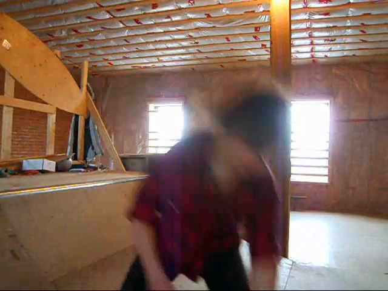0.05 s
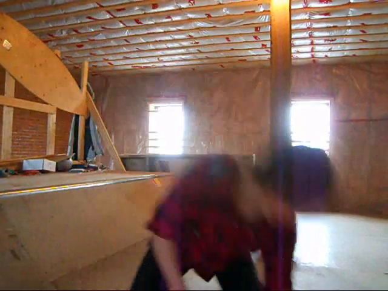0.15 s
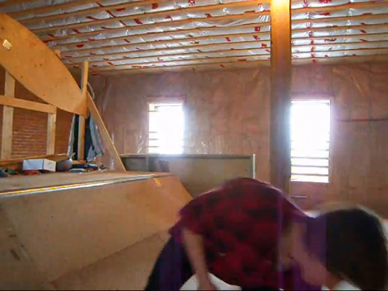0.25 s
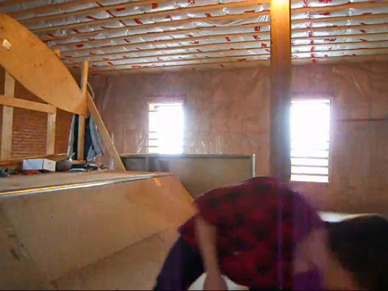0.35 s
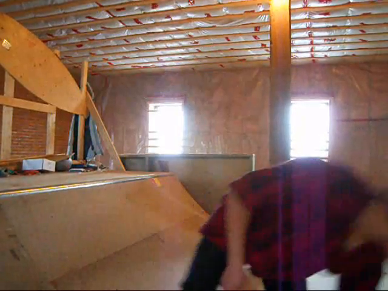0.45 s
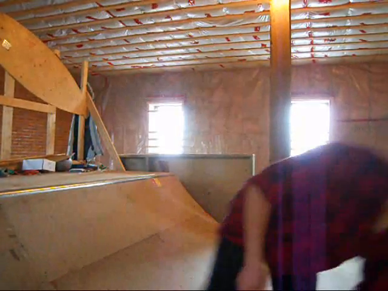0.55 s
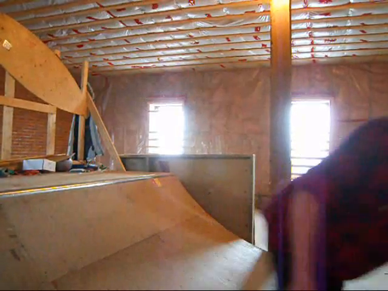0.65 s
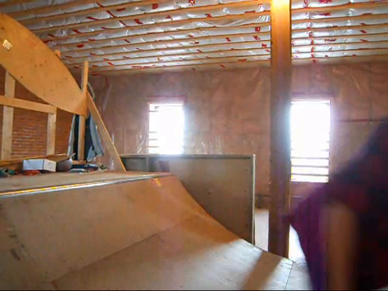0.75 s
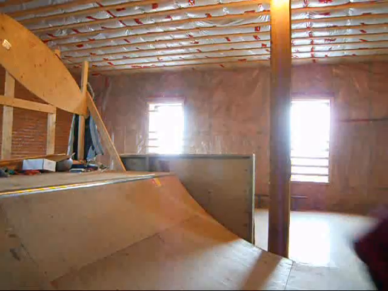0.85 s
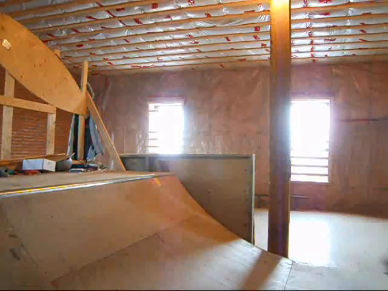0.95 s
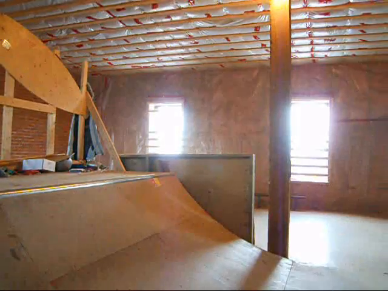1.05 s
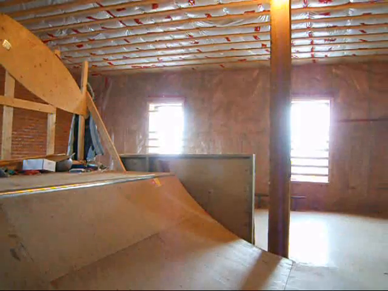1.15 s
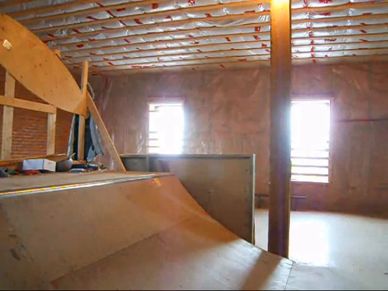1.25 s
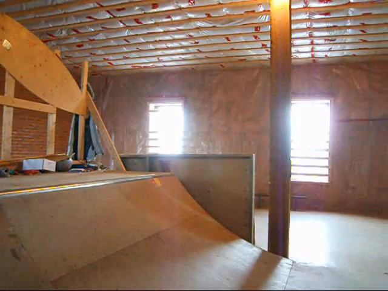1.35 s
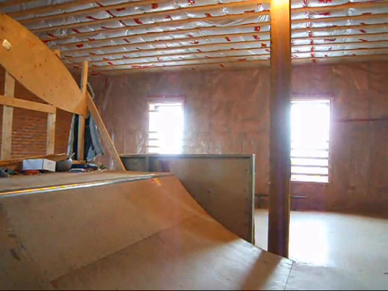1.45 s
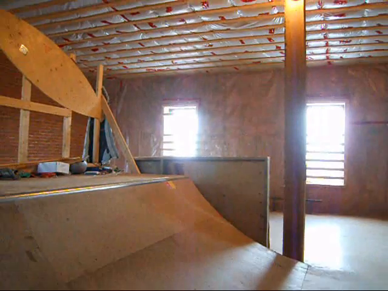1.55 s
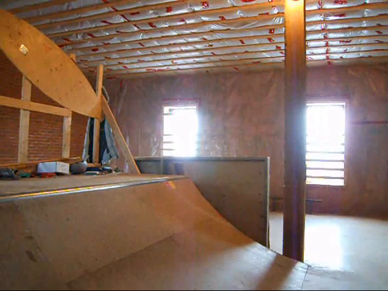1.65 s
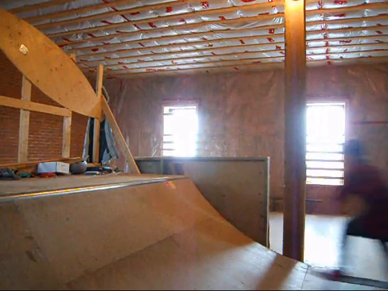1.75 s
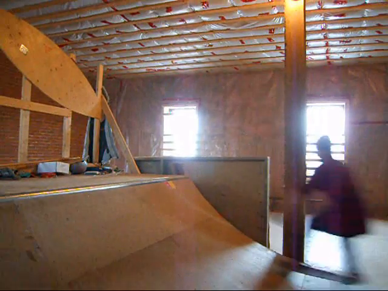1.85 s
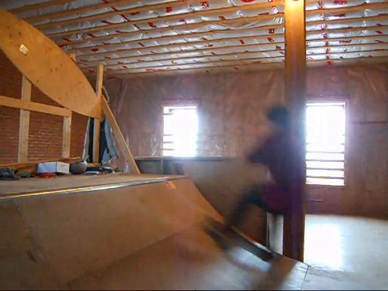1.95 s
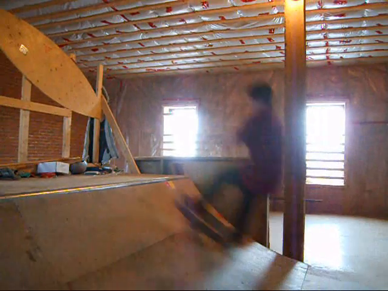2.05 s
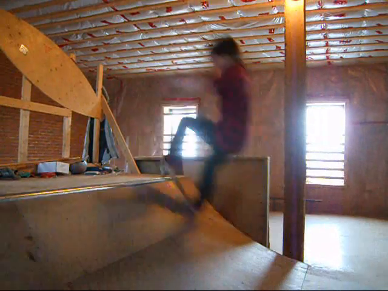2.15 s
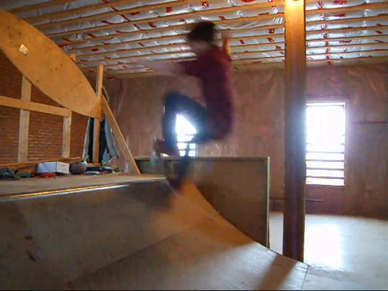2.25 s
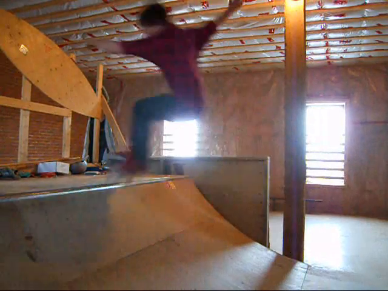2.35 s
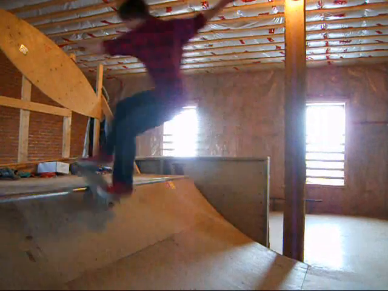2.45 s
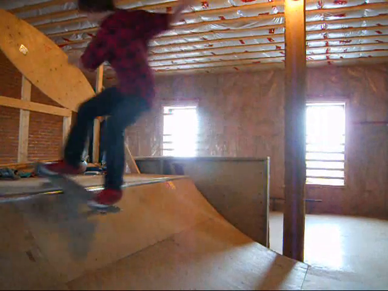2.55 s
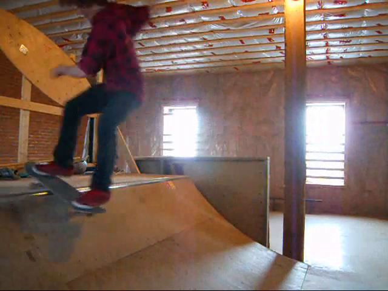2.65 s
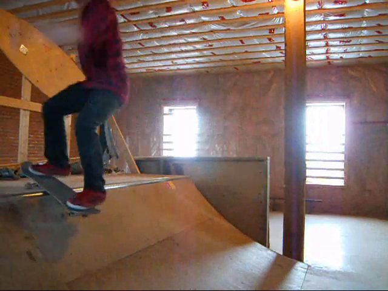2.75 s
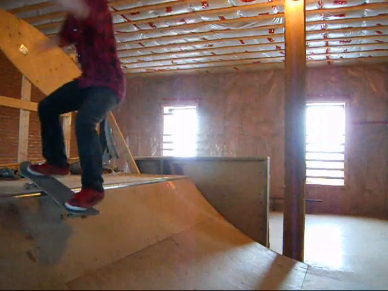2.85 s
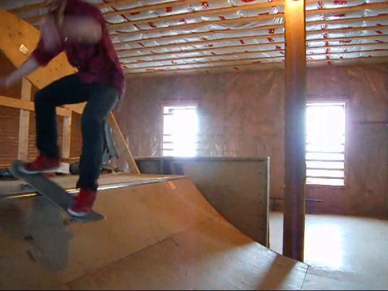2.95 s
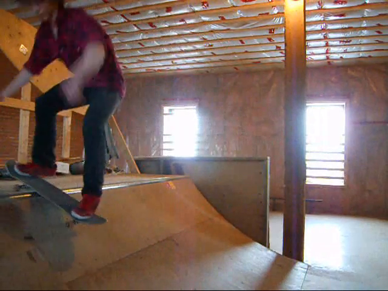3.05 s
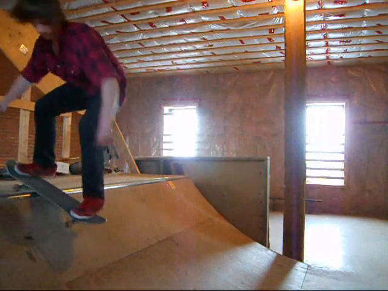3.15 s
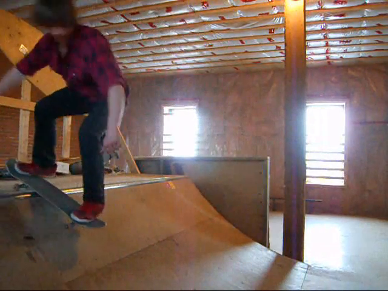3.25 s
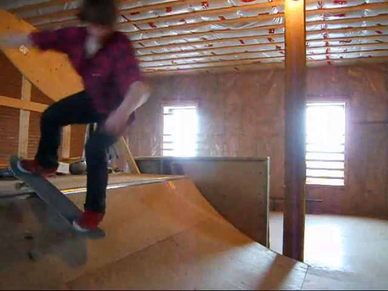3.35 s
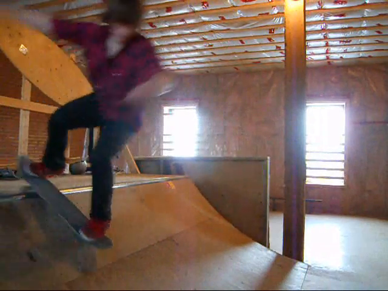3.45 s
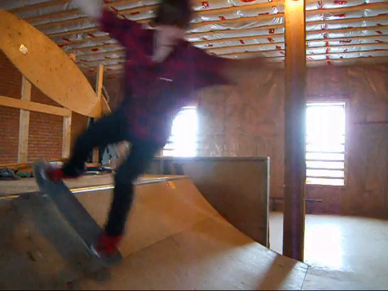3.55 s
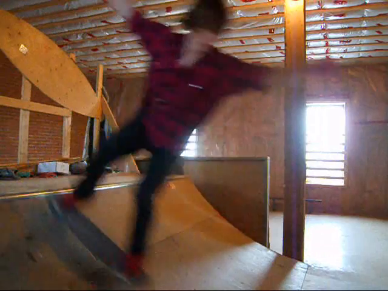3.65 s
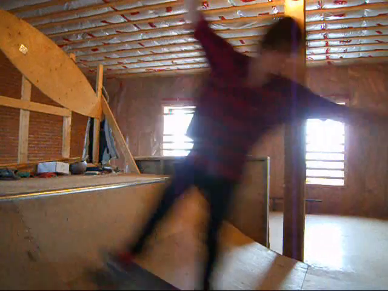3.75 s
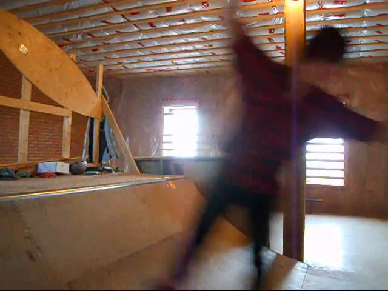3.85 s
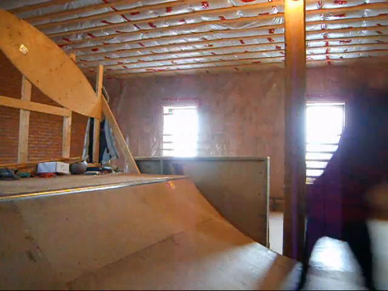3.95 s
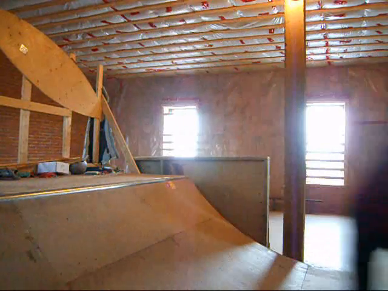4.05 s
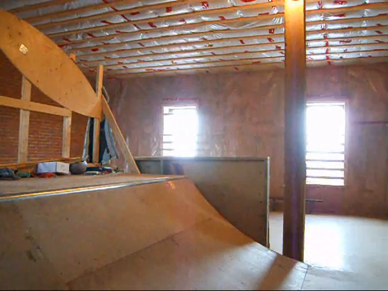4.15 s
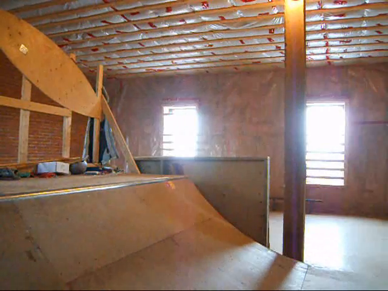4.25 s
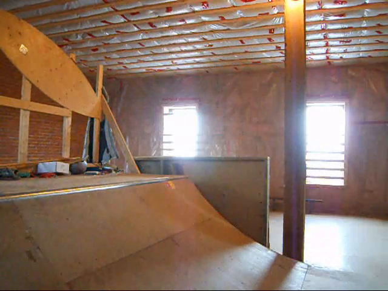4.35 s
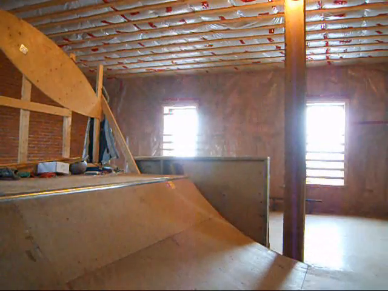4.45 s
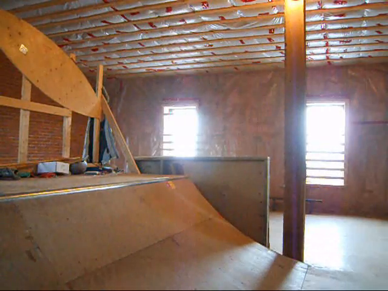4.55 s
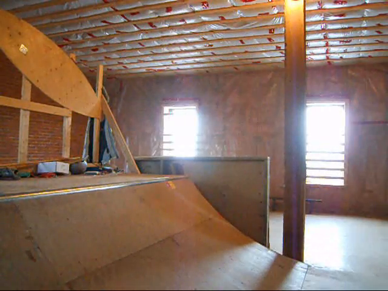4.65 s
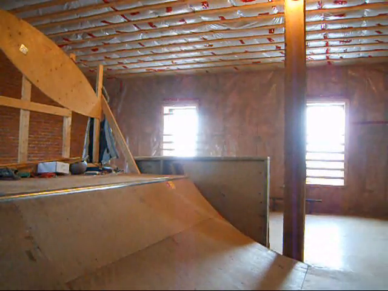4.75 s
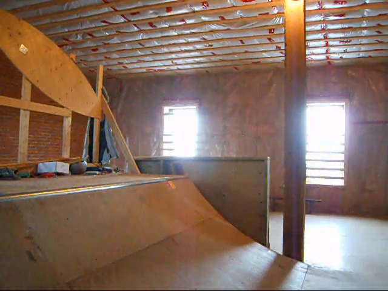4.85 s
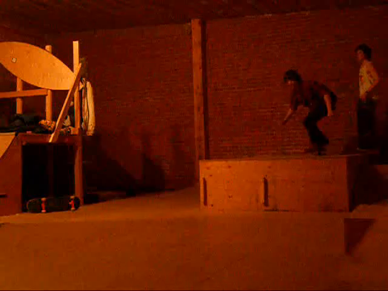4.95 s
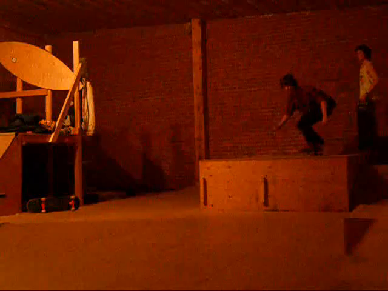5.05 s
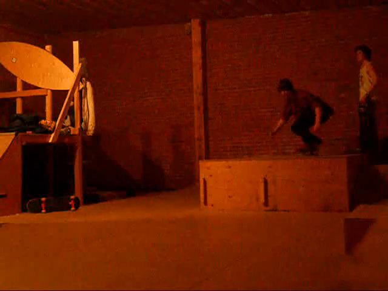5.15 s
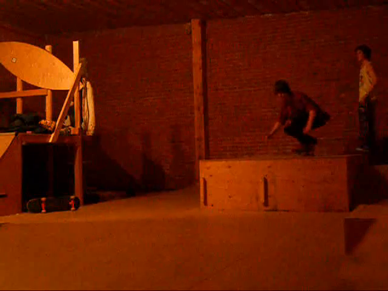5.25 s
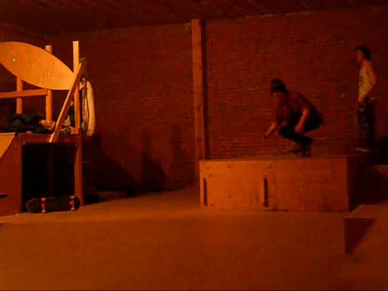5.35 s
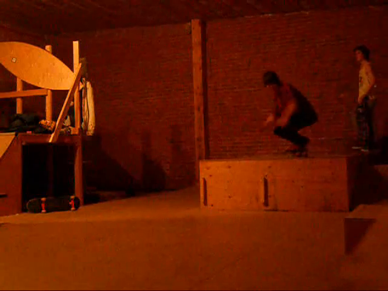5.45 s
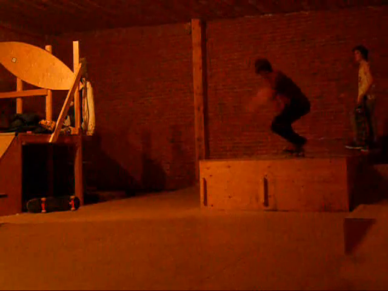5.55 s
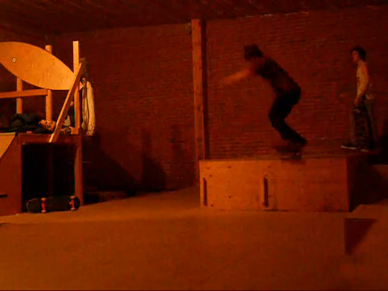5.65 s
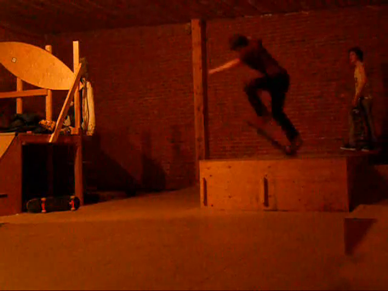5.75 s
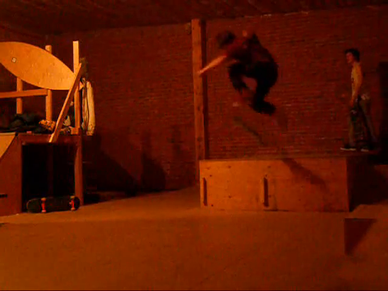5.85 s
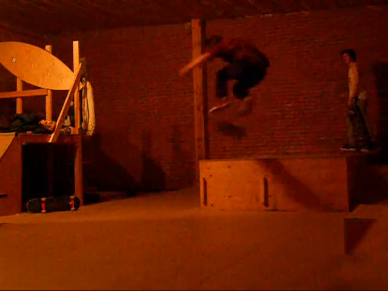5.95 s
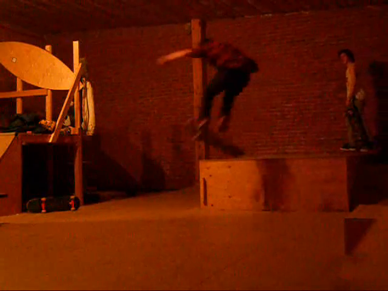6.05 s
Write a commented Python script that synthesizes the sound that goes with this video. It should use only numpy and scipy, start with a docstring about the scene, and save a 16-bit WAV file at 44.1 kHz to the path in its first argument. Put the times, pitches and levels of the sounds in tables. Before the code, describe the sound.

In a big, reverberant wooden loft, clothes rustle and a skateboard is set down with dry knocks close to the microphone. It rolls away quietly, then rumbles back up a plywood ramp and slams its trucks on the ringing steel edge. After a near-silent pause it drops in with a clack and rolls louder over bumpy joints. Harder clacks lead into a roaring, hollow roll along a box, ended by a bright tail crack and echo.

```python
"""A big loft with plywood ramps, where someone is skateboarding. The deck is set down close to the microphone, the
rider rolls away, comes back up a ramp, lands in a stall on its edge and drops in again; then he rolls along a
hollow box and pops the tail. Rolling is grainy noise shaped by panel and wheel resonances; contacts are short
impulses with dying chatter, ringing through the modes of ramp, deck and trucks; hard blows leave free sine
modes ringing. Clothes rustle, the floor sways, and band-wise decaying noise forms the room's reverberation."""
import sys
import numpy as np
from scipy import signal
from scipy.fft import rfft, irfft, next_fast_len
from scipy.io import wavfile

SR = 44100
rng = np.random.default_rng(int(sys.argv[2]) if len(sys.argv) > 2 else 0)


def to_wav(sig):
    """Store sig (one row per channel, or 1-D mono) as 16-bit WAV at the path in sys.argv[1].

    Samples outside -1..1 are clipped; the rate is SR.
    """
    pcm = np.clip(np.atleast_2d(sig), -1, 1) * 32767
    pcm = np.round(pcm).astype(np.int16)
    wavfile.write(sys.argv[1], SR, pcm.T)  # frames by channels


N = 268701

# the tail cracks on the box and the deck springs back:
# (time [s], truck clack level [dB], clack pitch [Hz], deck knock level [dB], room send [dB])
TAIL_CRACKS = [(5.8619, -14.5, 1850, -39, -26), (5.869, -16.5, 2180, -21.5, 5.5)]


def from_db(db):
    """Logarithmic level: decibels to amplitude gain."""
    return 10 ** (np.asarray(db) / 20)


def rms_one(x):
    """Power normalisation: scale to rms 1."""
    return x / np.sqrt(np.mean(x ** 2) + 1e-20)


def at_hz(points, hz):
    """Logarithmic frequency scale: interpolate a table along it."""
    f, value = np.transpose(points)
    return np.interp(np.log(np.maximum(hz, 1)), np.log(f), value)


def colour(x, spectrum):
    """Linear filtering: weight the signal's Fourier spectrum by a table, then scale to rms 1."""
    size = next_fast_len(len(x))
    hz = np.arange(size // 2 + 1) * SR / size
    weighted = rfft(x, size) * from_db(at_hz(spectrum, hz))
    return rms_one(irfft(weighted, size)[:len(x)])


def drift(rate_hz):
    """Low-pass random process: noise through two equal poles at rate_hz, with rms 1."""
    step = 40   # samples between the drawn values
    white = rng.standard_normal(N // step + 2002)
    r = np.exp(-2 * np.pi * step * rate_hz / SR)
    slow = signal.lfilter([1], [1, -2 * r, r * r], white)[2000:]   # the filter's start is dropped
    return np.interp(np.arange(N) / step, np.arange(len(slow)), rms_one(slow))


def resonate(x, modes):
    """Modal superposition: two-pole resonances in parallel, with alternating signs."""
    out = 0
    for k, (hz, width_hz, db) in enumerate(modes):
        r = np.exp(-np.pi * width_hz / SR)
        poles = [1, -2 * r * np.cos(2 * np.pi * hz / SR), r * r]
        zeros = [(1 - r * r) / 2, 0, (r * r - 1) / 2]
        out = out + (-1) ** k * from_db(db) * signal.lfilter(zeros, poles, x + 1e-18)
    return out


def pitched(modes, hz):
    """Frequency scaling: place a set of mode ratios on a pitch."""
    return [(ratio * hz, width_hz, db) for ratio, width_hz, db in modes]


def grains(per_s, spread_db, smooth_db):
    """Shot noise: tiny random impacts of uneven size over smooth friction noise."""
    sizes = from_db(spread_db * np.minimum(rng.exponential(1, N), 4)) * rng.choice([-1, 1], N)
    clicks = sizes * (rng.random(N) < per_s / SR)
    return rms_one(rms_one(clicks) + from_db(smooth_db) * rng.standard_normal(N))


def leak(power, seconds):
    """First-order energy balance: a store that fills and drains with this time constant."""
    r = np.exp(-1 / (seconds * SR))
    return signal.lfilter([1 - r], [1, -r], power + 1e-18)


def swells(rows, attack_s):
    """Incoherent addition: swells peak at their times, then die exponentially; their powers add."""
    t = np.arange(N) / SR
    power = 0
    for s, db, t60_s in rows:
        rise = np.clip(1 + (t - s) / attack_s, 0, 1)   # starts attack_s before the peak
        decay = from_db(db - 60 * np.clip((t - s) / t60_s, 0, 3))
        power = power + (rise * decay) ** 2
    return np.sqrt(power)


def ring(s, db, modes, tilt_db=0):
    """Free vibration: struck modes die exponentially as sines; the tilt is per octave about 2 kHz."""
    t = np.maximum(np.arange(N) / SR - s, 0)
    out = 0
    for hz, mode_db, t60_s in modes:
        start_db = db + mode_db + tilt_db * np.log2(hz / 2000)
        decay = from_db(start_db - 60 * np.clip(t / t60_s, 0, 3))
        out = out + decay * np.sin(2 * np.pi * hz * t)
    return out


def room_tone():
    """Stationary background noise: Gaussian noise with the room's spectrum."""
    # (frequency [Hz], relative density [dB per Hz])
    tone_spectrum = [(30, -3), (100, -13.5), (220, -18.5), (450, -18.5), (700, -23), (1800, -30.5),
                     (2400, -27), (3000, -41), (8000, -45), (16000, -49.5)]
    return from_db(-55) * colour(rng.standard_normal(N), tone_spectrum)


def loft(x, build_s):
    """Diffuse reverberation: bands store the sound's energy and return it as noise while it drains."""
    # reverberation time of the loft: (frequency [Hz], t60 [s])
    loft_t60 = [(80, 0.39), (250, 0.35), (700, 0.38), (2000, 0.5), (5000, 0.77), (15000, 0.62)]
    white, tail = rng.standard_normal((2, N)), 0
    edges_hz = np.geomspace(50, 17000, 15)
    for k, (low, high) in enumerate(zip(edges_hz, edges_hz[1:])):
        band = signal.butter(2, [low, high], "band", fs=SR, output="sos")
        drain_s = at_hz(loft_t60, np.sqrt(low * high)) / np.log(1e6)   # t60 to energy time constant
        power = signal.sosfilt(band, x + 1e-18) ** 2
        energy = leak(leak(power, build_s), drain_s)
        tail = tail + np.sqrt(energy) * rms_one(signal.sosfilt(band, white[k % 2]))
    return tail


def cloth_rustle():
    """Friction noise: clothes and shoe soles rub as the rider moves."""
    # (peak time [s], level [dB], t60 [s])
    moves = [(0, -24.5, 0.64), (0.2, -30.5, 0.51), (0.4, -36.5, 0.77), (1.02, -40, 0.38),
             (1.24, -44.5, 0.6), (1.6, -46, 1.2), (3.03, -58.5, 0.96)]
    # (frequency [Hz], relative density [dB per Hz])
    cloth_spectrum = [(400, -1), (1000, -5), (2000, -7.5), (3100, -4), (4500, -9.5), (6500, -10),
                      (10000, -13), (14000, -22), (16000, -10)]
    rubbing = grains(per_s=900, spread_db=0.0, smooth_db=2.5) * from_db(drift(27))
    return swells(moves, attack_s=0.22) * colour(rubbing, cloth_spectrum)


def floor_sway():
    """Low-frequency forced vibration: the rider's weight comes down and the floor sways."""
    # (peak time [s], level [dB], t60 [s])
    sways = [(0, -27.5, 0.79), (0.15, -16.5, 1), (0.63, -28.5, .7), (0.86, -22.5, 0.44), (1.26, -28, 2.2),
             (1.63, -25.5, .2), (1.9, -27.5, 0.95), (2.32, -42, .25), (2.52, -11.5, 0.16),
             (2.59, -29, 0.66), (3.12, -42, 1.5), (3.57, -22, 0.37), (4.09, -39, 1.0), (4.67, -32, .4),
             (5.02, -16.5, 0.71), (5.26, -20, 1.1), (5.48, -22, 2.5)]
    # (frequency [Hz], relative density [dB per Hz])
    shake_spectrum = [(8, -0.5), (15, 12.5), (24, -1.5), (38, -1.5), (58, -1.5), (80, -9), (120, -12.5),
                      (300, -32.5), (1000, -74.5)]
    rest_db = -46
    gain = np.hypot(swells(sways, attack_s=0.053), from_db(rest_db))
    return gain * colour(rng.standard_normal(N), shake_spectrum)


def on_the_wood(start_s, end_s):
    """Exponential onset and release: the loss in dB outside a run, so rolling starts and stops quickly."""
    onset_db_per_s, stop_db_per_s = 700, 378
    t = np.arange(N) / SR
    return -onset_db_per_s * np.maximum(start_s - t, 0) - stop_db_per_s * np.maximum(t - end_s, 0)


def run_db(curve):
    """Level interpolation: one run's curve in dB, cut off outside the run."""
    s, db = np.transpose(curve)
    return np.interp(np.arange(N) / SR, s, db) + on_the_wood(s[0], s[-1])


def follower(rumble_db, usual_db, share):
    """Level compression: gain of a layer that follows a share of the rumble's swing in dB."""
    usual_rumble_db = -24   # here the layer has its usual level
    return from_db(usual_db + share * (rumble_db - usual_rumble_db))


def wheels(rumble_gain, grit_gain, modes, body, surface, bump_db):
    """Rolling excitation: grain and dust make panels boom and treads hiss; one random load drives both."""
    load_db = bump_db * drift(30)
    force = grains(per_s=1100, spread_db=2.5, smooth_db=-4.0) * from_db(load_db)
    panels = sum(resonate(force, [mode]) for mode in modes)
    rumble = colour(force + panels, body)
    dust = grains(per_s=4100, spread_db=6, smooth_db=10.5) * from_db(.5 * load_db)
    return rumble_gain * rumble + grit_gain * colour(dust, surface)


def flat_floor(rumble_db):
    """Impedance mismatch: the stiff floor hardly booms, so the wheels' own resonances are heard."""
    # wheel resonances, each applied twice in series: (frequency [Hz], width [Hz], gain per pass [dB])
    wheel_modes = [(670, 300, 1), (790, 120, 3.5)]
    force = grains(per_s=1600, spread_db=0.5, smooth_db=-9.0)
    hum = sum(resonate(resonate(force, [mode]), [mode]) for mode in wheel_modes)
    return follower(rumble_db, usual_db=-33.5, share=0.64) * rms_one(hum)


def rolling_wheels():
    """Common excitation: over floor and ramp one level drives rumble, hiss and hum."""
    # rolling level of each run before its trim below: (time [s], level [dB])
    push_off = [(0.0, -39.5), (0.18, -44), (0.38, -43.5), (0.5, -32.5), (0.538, -30.5), (0.615, -25.5)]
    roll_away = [(0.72, -39), (0.83, -40), (0.974, -49), (1.188, -52.5), (1.444, -42), (1.6, -44.5)]
    run_up = [(1.66, -32.5), (1.802, -30), (1.996, -24), (2.168, -26), (2.3, -32)]
    drop_in = [(3.5, -43), (3.604, -46), (3.716, -35.5), (3.98, -28), (4.452, -26.5), (4.59, -22.5),
               (4.752, -20), (4.852, -17), (5.0, -16)]
    # wheels whirr up under a push or as they leave the ramp: (peak time [s], level [dB], rise [s])
    spins = [(0.62, -28.5, 0.1), (2.33, -29.5, 0.1)]
    # plywood panels under the wheels: (frequency [Hz], width [Hz], gain over the broad force [dB])
    plywood_modes = [(174, 16, 2.5), (491.6, 40, 5.5), (570, 25, 0.5), (640, 16, 5.5)]
    # spectra of rumble and tread hiss: (frequency [Hz], relative density [dB per Hz])
    rumble_spectrum = [(45, -20.5), (70, -7), (100, -1), (160, -1.5), (210, 1), (265, -2), (380, 2.5),
                       (500, -3.5), (620, -2), (720, -6), (900, -10), (1300, -40.5), (3000, -52.5)]
    grit_spectrum = [(500, -28.5), (950, -2), (1400, 0), (2300, -5), (3300, -9.5), (4500, -13.5),
                     (6500, -14.5), (10000, -18), (12000, -20), (14000, -17.5), (16000, -30)]
    push_off_trim_db, roll_away_trim_db, run_up_trim_db, drop_in_trim_db = 3.5, -0.5, 3.5, 2.5
    spin_t60_s = 0.9

    floor_db = np.maximum(run_db(push_off) + push_off_trim_db, run_db(roll_away) + roll_away_trim_db)
    slope_db = np.maximum(run_db(run_up) + run_up_trim_db, run_db(drop_in) + drop_in_trim_db)
    rumble_db = np.maximum(floor_db, slope_db)
    spin = sum(swells([(s, db, spin_t60_s)], rise_s) for s, db, rise_s in spins)
    grit = np.hypot(follower(rumble_db, usual_db=-33, share=0.73), spin)
    rolling = wheels(from_db(rumble_db), grit, plywood_modes, rumble_spectrum, grit_spectrum, bump_db=1.53)
    return rolling + flat_floor(floor_db)


def blow(t, rattle_s, rattle_db):
    """Impulse with decaying noise: a touch, then chatter of wheels and trucks, stronger if it is longer."""
    chatter = rng.standard_normal(len(t)) * from_db(rattle_db - 60 * t / rattle_s)
    return (t == 0) + chatter * np.sqrt(rattle_s / 0.065)


def contact(s, thump_db, thump_hz, knock_db, knock_hz, clack_db, clack_hz, tick_db, rattle_s, room_db):
    """Modal impact: a contact rings ramp, deck and trucks; returns the direct sound and the room send."""
    # resonances: (multiple of the contact's pitch [ratio], width [Hz], relative gain [dB])
    ramp_modes = [(.5, 35, -6.5), (1.0, 26.5, -1), (1.35, 49, -10), (1.85, 60, -7), (2.3, 70.3, -12)]
    deck_modes = [(.76, 80, -1.5), (1.0, 50, 5.5), (1.27, 91.3, 0), (1.72, 160, -9.5), (2.3, 221, -14.5)]
    truck_modes = [(.7, 380, 2.5), (1.0, 280, 7), (1.24, 401, 2), (1.5, 362, 4), (1.92, 450, -1),
                   (2.35, 510, -5), (3.0, 905, -35.5)]
    # noise of the hard edge: (frequency [Hz], relative density [dB per Hz])
    tick_spectrum = [(2000, -29.5), (4200, 0), (6000, 0), (9000, -1), (12000, -6.5), (14000, 3),
                     (16000, -18)]
    t = np.arange(SR // 2) / SR
    # the heavy ramp hardly follows the chatter; the light trucks follow it most
    thump = resonate(blow(t, rattle_s, rattle_db=-25.5), pitched(ramp_modes, thump_hz))
    knock = resonate(blow(t, rattle_s, rattle_db=-24.5), pitched(deck_modes, knock_hz))
    clack = resonate(blow(t, rattle_s, rattle_db=-17.5), pitched(truck_modes, clack_hz))
    # the hard edge gives a very short burst of treble, then follows the chatter
    tick_decay = from_db(-60 * t / 0.015) + from_db(2.0 - 60 * t / rattle_s)
    bite = 1 - np.exp(-t / 0.00054)   # rise time constant in s
    tick = colour(rng.standard_normal(len(t)), tick_spectrum) * tick_decay * bite
    attack = SR // 50   # levels hold for the first 20 ms
    parts = zip((thump, knock, clack, tick), (thump_db, knock_db, clack_db, tick_db))
    hit = sum(from_db(db) * part / np.std(part[:attack]) for part, db in parts)
    out, at = np.zeros((2, N + SR)), int(s * SR)
    out[:, at:at + len(t)] = hit, from_db(room_db) * hit
    return out[:, :N]


def soft_treads():
    """Soft-contact excitation: a soft sole on floor or deck brings out mainly the low thump."""
    # (time [s], thump level [dB], thump pitch [Hz])
    tread_rows = [(0.085, -27, 214), (1.25, -40, 84), (3.045, -47, 139.5), (3.087, -52, 143)]
    return sum(contact(s, thump_db=db, thump_hz=hz, knock_db=db - 14.5, knock_hz=450,
                       clack_db=db - 13.5, clack_hz=1550, tick_db=db - 17.5, rattle_s=0.14, room_db=3)
               for s, db, hz in tread_rows)


def deck_knocks():
    """Near-field impact: the deck, set down and stepped on by the microphone, leads in dry knocks."""
    # (time [s], deck knock level [dB], knock pitch [Hz], truck clack level [dB], edge tick level [dB])
    knock_rows = [(0.11, -25, 680, -44, -50.5), (0.19, -32, 720, -54, -54), (0.3278, -14, 590, -34.5, -37),
                  (0.3382, -17.5, 700, -48, -43), (0.357, -15, 637, -31.5, -33.5),
                  (0.439, -25.5, 638, -38.5, -42.5), (0.4741, -27, 873, -31.5, -36.5),
                  (0.629, -14.5, 486, -13, -24.5), (0.651, -37, 606, -28, -34.5),
                  (0.84, -32.5, 497, -45, -60), (0.942, -25.5, 428, -50, -44)]
    return sum(contact(s, thump_db=db - 9, thump_hz=280, knock_db=db, knock_hz=hz,
                       clack_db=clack_db, clack_hz=1450, tick_db=tick_db - 7 + 7, rattle_s=0.051, room_db=-11.5)
               for s, db, hz, clack_db, tick_db in knock_rows)


def light_taps():
    """Light-body excitation: shoes scuff the grip and loose trucks click in bright touches."""
    # (time [s], clack level [dB], clack pitch [Hz], edge tick level [dB], ramp thump level [dB],
    #  rattle t60 [s])
    tap_rows = [(0.452, -39.5, 2170, -44, -54.5, 0.043), (0.948, -33, 1600, -43, -50, .16),
                (1.155, -48, 1980, -55, -67, 0.039), (1.187, -44.5, 2520, -39.5, -50, 0.22),
                (1.545, -44, 1930, -48, -60, 0.024), (3.298, -62.5, 1700, -72.5, -50, 0.053),
                (3.421, -48, 1580, -54, -41, .07), (3.45, -46, 1470, -56, -36.5, 0.14),
                (3.479, -45, 1790, -51, -31, 0.14)]
    return sum(contact(s, thump_db=thump_db, thump_hz=135, knock_db=db, knock_hz=560,
                       clack_db=db, clack_hz=hz, tick_db=tick_db, rattle_s=rattle_s, room_db=-3.0)
               for s, db, hz, tick_db, thump_db, rattle_s in tap_rows)


def sheet_joints():
    """Step excitation: wheels bump dully over joints between the sheets; the trucks only murmur along."""
    # (time [s], ramp thump level [dB], thump pitch [Hz], deck knock level [dB])
    joint_rows = [(1.625, -26, 172, -26.5), (1.889, -20.5, 183, -24.5), (1.968, -28, 173, -24),
                  (2.086, -21, 180, -20.5), (3.672, -29, 160, -36.5), (3.8, -25, 113, -27.5),
                  (3.895, -30.5, 165, -29), (3.949, -23, 171, -23), (4.008, -20.5, 147, -22),
                  (4.036, -22.5, 135, -19.5), (4.07, -18, 140, -24.5), (4.559, -15, 149, -35),
                  (4.672, -15, 159, -19), (4.838, -42, 193, -16)]
    hits = 0
    for s, db, hz, knock_db in joint_rows:
        mean_db = (db + knock_db) / 2
        hits = hits + contact(s, thump_db=db, thump_hz=hz, knock_db=knock_db, knock_hz=506,
                              clack_db=mean_db - 15, clack_hz=1500, tick_db=mean_db - 19,
                              rattle_s=0.111, room_db=-2.0)
    return hits


def truck_slams():
    """Coupled impact: trucks slam onto ramp edge and box, ringing everything and filling the room."""
    # (time [s], truck clack level [dB], clack pitch [Hz], ramp thump level [dB], thump pitch [Hz],
    #  rattle t60 [s])
    slam_rows = [(2.299, -24.5, 1370, -18, 165, 0.072), (2.304, -19.5, 1450, -20, 184, 0.12),
                 (2.313, -31.5, 1450, -26, 210, .19), (2.476, -17.5, 1440, -18, 193, 0.17),
                 (2.4976, -12.5, 1650, -20, 160, 0.04), (2.511, -32, 1470, -20.5, 216.4, 0.11),
                 (2.521, -39.5, 1425, -16.5, 104, 0.063), (3.5192, -27, 2060, -24.5, 118, 0.051),
                 (3.525, -30.5, 1710, -23, 105, 0.16), (5.247, -19, 1640, -26, 200, 0.04),
                 (5.254, -18.5, 1800, -19.5, 195, 0.12), (5.464, -23.5, 1710, -26.5, 92, 0.38)]
    deck_over_ramp = 3.55   # pitch ratio: a loaded deck and the ramp under it move in pitch together
    hits = 0
    for s, db, hz, thump_db, thump_hz, rattle_s in slam_rows:
        knock_db = (db + thump_db) / 2 - 0.5
        hits = hits + contact(s, thump_db=thump_db, thump_hz=thump_hz,
                              knock_db=knock_db, knock_hz=deck_over_ramp * thump_hz,
                              clack_db=db, clack_hz=hz, tick_db=db - 8, rattle_s=rattle_s, room_db=-1.1)
    return hits


def ramp_edge():
    """Free vibration of steel: the ramp's edge rings when a truck strikes or leaves it."""
    # (frequency [Hz], relative level [dB], t60 [s])
    edge_modes = [(1230, -2.5, .3), (1450, 1.5, .35), (1793, -4, 0.19), (3010, -4, .2), (3810, -6, .27),
                  (4161, -11.5, .3), (4657, -6.5, 0.12)]
    # (time [s], level [dB], tilt [dB per octave])
    edge_blows = [(2.304, -28.5, -9.5), (2.499, -33, 6), (3.52, -34.5, 3.5)]
    return sum(ring(s, db, edge_modes, tilt_db) for s, db, tilt_db in edge_blows)


def along_box():
    """Cavity resonance: the hollow box booms and the wheels roar, fading, then surging under the crouch."""
    # box panels: (frequency [Hz], width [Hz], gain over the broad force [dB])
    box_modes = [(224, 40, -13), (565, 16, -22), (700, 57, -7)]
    # spectra of boom and roar: (frequency [Hz], relative density [dB per Hz])
    boom_spectrum = [(50, -12), (110, -4), (200, 3.5), (280, 0), (500, 1.5), (700, -3), (950, -10),
                     (1500, -15), (3000, -40)]
    roar_spectrum = [(600, -19), (1000, -1.5), (1400, 3.5), (1900, 1.5), (2450, -0.5), (3200, -8),
                     (4500, -12), (6500, -15), (10000, -16.5), (12000, -20), (14000, -13.5), (16000, -25)]
    start_s, end_s, slowing_db_per_s = 5.02, 5.868, 9
    crouch_s = 5.77   # the rider's crouch loads the wheels before the pop
    coast_db = -slowing_db_per_s * np.maximum(np.arange(N) / SR - start_s, 0)
    # each surge: (peak time [s], level [dB], t60 [s])
    boom = np.hypot(from_db(-23 + coast_db), swells([(crouch_s, -17.5, 0.99)], attack_s=0.16))
    roar = np.hypot(from_db(-22.5 + coast_db), swells([(crouch_s, -18.5, 2)], attack_s=0.23))
    rolling = wheels(boom, roar, box_modes, boom_spectrum, roar_spectrum, bump_db=-0.3)
    return from_db(on_the_wood(start_s, end_s)) * rolling


def tail_pop():
    """Unloaded-plate impact: the free deck rings high and the box hardly thumps."""
    return sum(contact(s, thump_db=-41, thump_hz=200, knock_db=knock_db, knock_hz=1040,
                       clack_db=db, clack_hz=hz, tick_db=db - 7, rattle_s=0.062, room_db=room_db)
               for s, db, hz, knock_db, room_db in TAIL_CRACKS)


def airborne_board():
    """Free-boundary vibration: once the wheels leave the wood the board rings freely."""
    # (frequency [Hz], relative level [dB], t60 [s])
    board_modes = [(1006, 1, 0.38), (1360, -14, .4), (1980, -2, .4), (2751, -4, 0.53), (3252, -6, .35)]
    return ring(TAIL_CRACKS[-1][0], -26, board_modes)


def scene():
    """Superposition: rolling, contacts, ringing and rustle in the loft, over the shaking floor."""
    rolling = rolling_wheels() + along_box()
    hits, send = soft_treads() + deck_knocks() + light_taps() + sheet_joints() + truck_slams() + tail_pop()
    room = loft(from_db(-4.5) * send + from_db(-12.5) * rolling, build_s=.006)
    ringing = ramp_edge() + airborne_board()
    background = room_tone() + cloth_rustle() + floor_sway()
    return (from_db(-2.5) * rolling + hits + ringing + room + background)[None]


def record(dry):
    """Transducer response: a partial treble notch, clipping of the loudest peaks and a steep top cut."""
    notch_hz, notch_depth, cutoff_hz = 8000, .68, 15800
    notched = signal.lfilter(*signal.iirnotch(notch_hz, 4.5, fs=SR), dry)
    heard = np.clip(dry + notch_depth * (notched - dry), -1, 1)
    return signal.sosfilt(signal.ellip(12, .2, 90, cutoff_hz, fs=SR, output="sos"), heard)


dry = scene()
out = record(dry)
to_wav(out)
```